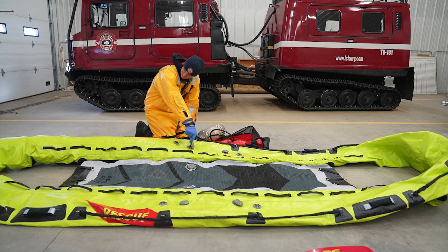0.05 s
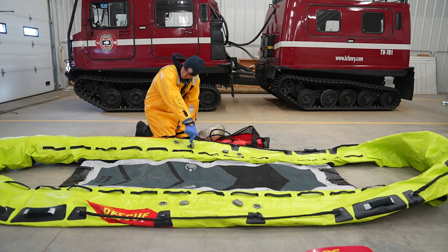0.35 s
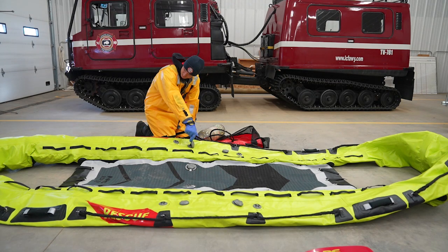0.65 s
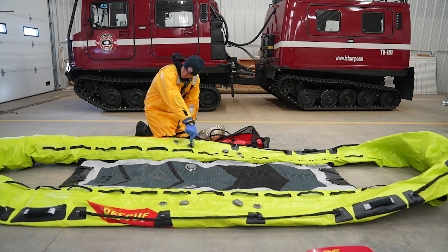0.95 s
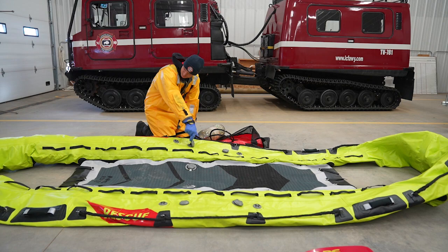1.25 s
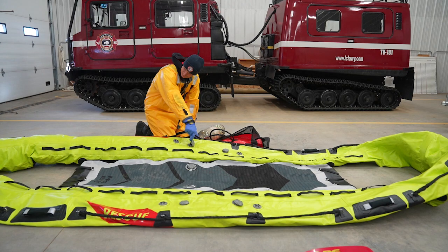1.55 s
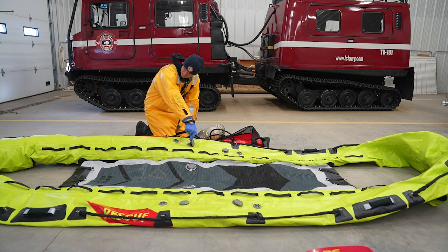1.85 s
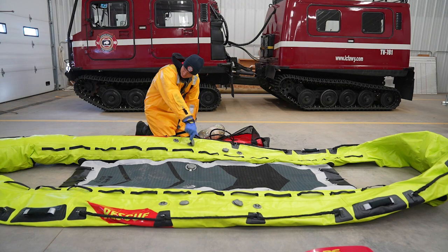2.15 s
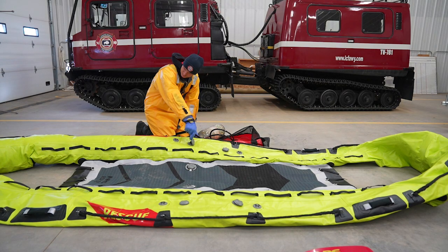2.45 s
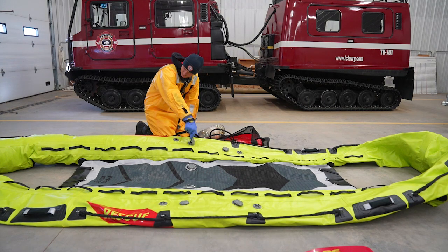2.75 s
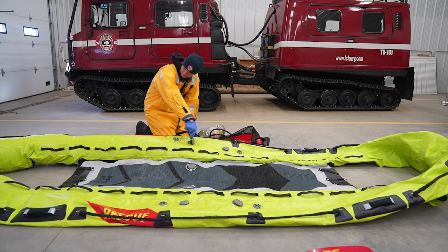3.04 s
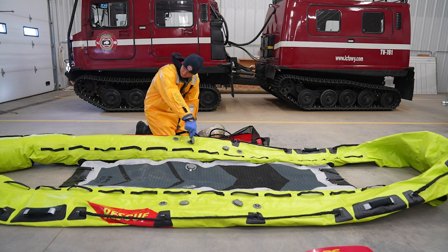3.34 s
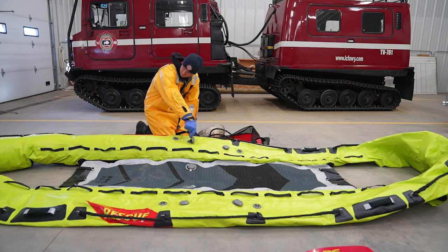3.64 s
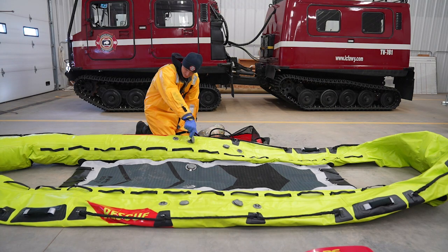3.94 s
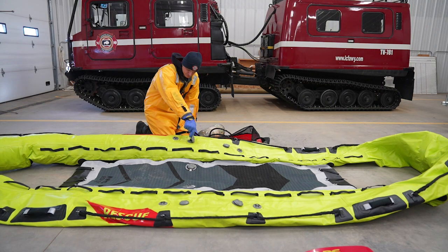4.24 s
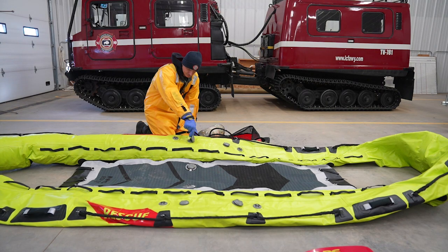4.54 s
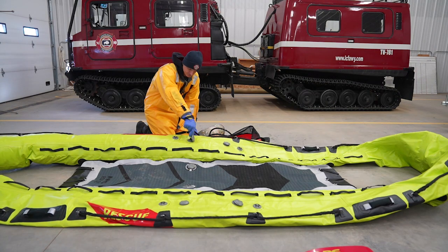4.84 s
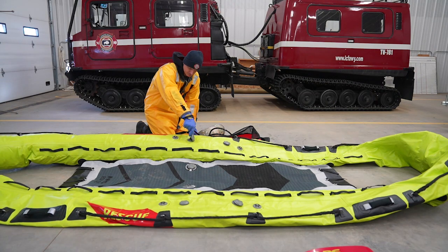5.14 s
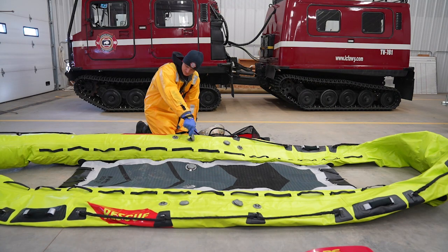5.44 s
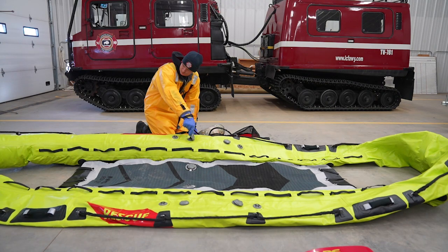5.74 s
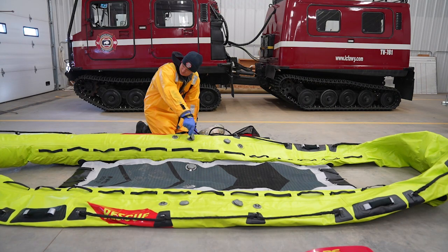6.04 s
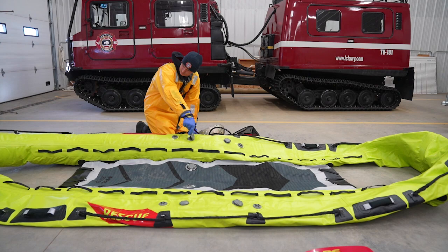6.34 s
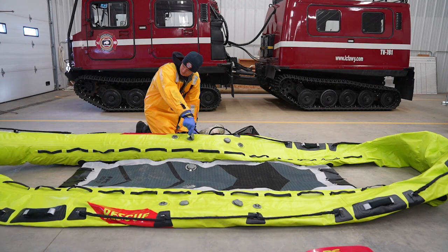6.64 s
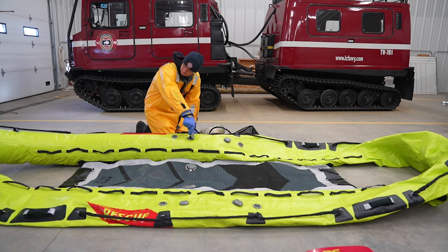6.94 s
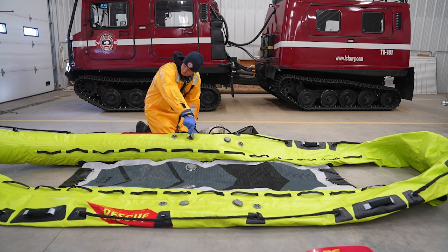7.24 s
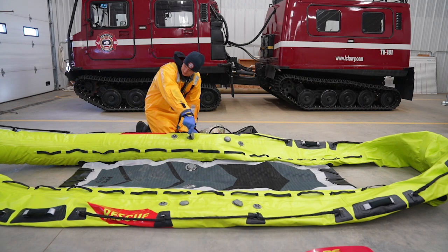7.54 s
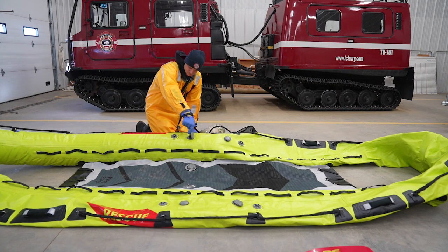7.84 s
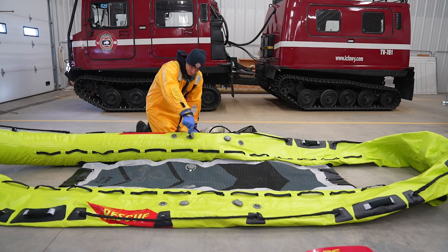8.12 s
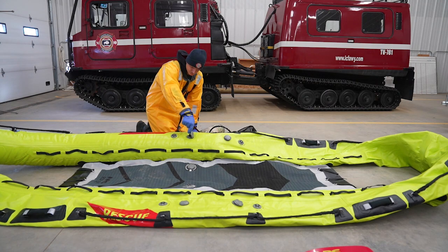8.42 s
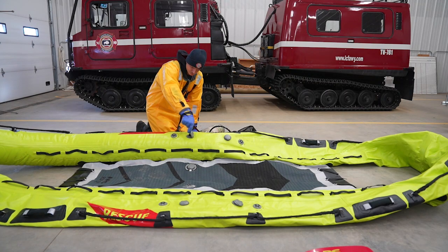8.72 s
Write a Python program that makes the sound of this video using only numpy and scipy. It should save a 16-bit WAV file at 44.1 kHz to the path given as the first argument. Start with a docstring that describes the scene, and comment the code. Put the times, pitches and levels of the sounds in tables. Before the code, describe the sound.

Compressed air hisses without a break through a valve into an inflatable boat, with a faint hollow rush inside the tube. Short breathy whistles swell and fade along the way. As the tube fills, creases in the fabric pop out with a few soft thumps and the high sizzle creeps up in pitch. The microphone is a few metres away in a lightly echoing garage.

```python
"""An inflatable boat being filled on a garage floor, heard by a mono microphone a few metres away.
From the start, compressed air hisses through a hand-held valve, ringing the valve and the hollow tube;
breathy whistles swell and die at the valve's edges. From about 2 s, creases in the fabric pop out with
soft thumps, the loudest just after 7 s. From 3 s on the tube rises faster: its colour shifts and the
jet's sizzle climbs. A last cluster of whistles comes near 8.6 s. The garage echoes throughout."""
import sys
import numpy as np
from scipy import signal
from scipy.fft import rfft, irfft, next_fast_len
from scipy.io import wavfile

SR = 44100
rng = np.random.default_rng(int(sys.argv[2]) if len(sys.argv) > 2 else 0)


def generate_wav(signal):
    """Clip the signal to [-1, 1] and save it as 16-bit WAV at the path in sys.argv[1]."""
    frames = np.transpose(np.atleast_2d(signal))
    scaled = np.clip(frames, -1, 1) * 32767
    pcm = np.round(scaled).astype(np.int16)
    wavfile.write(sys.argv[1], SR, pcm)


N = 391589
TIME = np.arange(N) / SR

# Air flow through the valve. Each row: time in seconds, level of its rush in dB.
FLOW = [(0, -35.5), (0.62, -35.5), (0.82, -37), (1.25, -37), (1.85, -36), (2.08, -35), (2.35, -36),
        (2.6, -34.9), (3.48, -36), (3.65, -34.5), (4.2, -33.5), (4.95, -34.5), (5.3, -34), (6.8, -34),
        (7.1, -34), (8.0, -33.5), (8.8, -32.5)]
# How far the tube has risen. Each row: time in seconds, fill from 0 to 1.
FILL = [(0, 0.12), (3, 0.15), (4.2, 0.43), (6.3, 0.69), (7.5, 0.84), (8.88, 1)]
# Colours of the valve's fine spray, its lower rush and the roar in the tube.
# Each row: frequency in Hz, relative spectral level in dB.
SPRAY_COLOUR = [(6000, -29), (8000, -11), (9600, -1.5), (11000, 1.4), (12000, 2.5), (13000, 0.3),
                (14600, 1.5), (16000, 0)]
RUSH_COLOUR = [(2200, -16), (3000, -14), (3400, -4.5), (3900, 1), (4400, 4.5), (5200, 3.5), (6100, 2),
               (7300, 0.25), (8800, 3), (11000, -16.5)]
TUBE_COLOUR = [(40, -32), (100, -23.5), (250, -14.5), (420, -12.5), (530, -5.5), (700, -3), (920, -2),
               (1250, -2), (1850, 2), (2300, -1.5), (2850, -8), (4000, -21)]
# Resonances and notches of the valve and of the air in the tube.
# Each row: centre in Hz, width in Hz, gain in dB with the tube slack, gain in dB with it full.
VALVE_MODES = [(3020, 330, 1.5, 3), (5300, 89, 0.5, -7), (5580, 170, -1, -2.5), (5870, 190, 1, -8),
               (6170, 180, 2, -1), (6560, 170, -3, 1.5), (7500, 500, -3, -0.5), (8910, 260, 6.5, 3),
               (8980, 340, -3, -4.5), (9700, 250, 5.5, 4), (10320, 170, 6.5, -4), (10600, 280, 0, 8.5),
               (11060, 250, 4.5, 4.5), (11350, 400, -2, 3.5), (12020, 690, -2, 6), (13450, 250, 5, 1),
               (13340, 250, -3, 10.5), (13850, 300, 0.5, 0.5), (14500, 250, 3, 8), (15200, 350, -0.5, 4.5)]
TUBE_MODES = [(543, 52, 0, -1), (600, 95, -0.5, -3.5), (808, 160, 0.5, -3), (918, 38, -11.5, -9),
              (1042, 65, 0.5, -7), (1294, 80, -8, 3.5), (1510, 46, -2, 3), (1653, 84, 5, -9),
              (1870, 120, 1.5, 0), (2020, 86, 7, -5)]
# Short spurts at the valve's edge. Each row: peak time and length in seconds, pitch in Hz, level in dB.
SPURTS = [(0.169, .42, 3950, -36.5), (0.181, .3, 5000, -30), (.36, 0.061, 3940, -33),
          (0.602, .08, 4820, -28.5), (0.621, .1, 3820, -31), (1.039, .06, 4370, -34),
          (1.284, 0.024, 4430, -32), (2.106, .24, 4770, -33.5), (2.603, .18, 4860, -29),
          (3.06, 0.046, 4160, -38), (4.125, .24, 5200, -32), (6.995, 0.16, 4240, -36.5),
          (7.647, 0.25, 4150, -32.5)]
# Long whistles: most sing at the valve, the low 2450 Hz one in the tube. # Each row: peak time and length in
# seconds, pitch and width in Hz, level in dB.
LONG_WHISTLES = [(0.097, 0.36, 2450, 350, -45.5), (.15, .5, 15500, 700, -32),
                 (2.64, 0.19, 13800, 1500, -31), (5.7, 2.6, 5540, 200, -39.5),
                 (7.201, .9, 6000, 300, -37.5), (7.27, 0.7, 8650, 1000, -30.5),
                 (7.801, 0.55, 15200, 1010, -38), (8.598, 0.68, 3650, 800, -42),
                 (8.598, .4, 8070, 1050, -30), (8.622, 0.45, 14400, 1200, -29.5)]
# The sizzle climbs as the tube lifts the valve. Each row: time in seconds, pitch in Hz, level in dB.
SIZZLE = [(0, 9750, -39), (1.7, 9820, -41), (2.1, 9700, -32), (3.0, 10180, -38), (4.1, 10180, -32.5),
          (5.0, 10350, -41), (5.7, 11450, -35), (7.1, 11770, -33), (8.2, 11830, -36), (8.5, 11900, -55)]
# Hollows that open and close in the hiss.
# Each row: deepest moment and length in seconds, centre and width in Hz, depth in dB.
HOLLOWS = [(.1, 1, 14000, 900, -1), (6.5, 4, 13240, 400, -6), (7.3, 1.1, 10600, 300, -5),
           (8.6, 0.41, 12100, 500, -8), (8.6, 0.97, 5150, 450, -6), (8.75, .4, 6400, 300, -9)]
# Hard surfaces by the valve. Each row: echo delay in seconds with the tube slack, share reflected.
SURFACES = [(.0031, 0.056), (.0074, 0.11), (0.0127, 0.18)]
# The garage's low room tone. Each row: frequency in Hz, relative spectral level in dB.
ROOM_COLOUR = [(20, -12), (45, -2), (75, -3), (100, 2.5), (160, 2.5), (400, -5), (1500, -27)]
# Creases popping out. Each row: start in seconds, level in dB, pitch in Hz.
CREASES = [(1.876, -51, 114.3), (3.173, -38, 134), (3.745, -39.5, 163), (4.743, -48, 123),
           (5.420, -32, 300), (5.428, -36.5, 95.5), (6.757, -39, 150), (6.828, -35, 210), (6.979, -38, 189),
           (7.175, -22.5, 480), (7.178, -37, 169), (7.688, -36, 104), (8.195, -44, 109)]


def undb(db):
    """Decibels to gain."""
    return 10 ** (np.asarray(db) / 20)


def curve(table, column=1):
    """One column of a table of times, joined by straight lines."""
    rows = np.array(table)
    return np.interp(TIME, rows[:, 0], rows[:, column])


def walk(rate):
    """A random drift with a spread near 1 and about rate turns a second."""
    steps = rng.standard_normal(2048)
    return 1.2 * np.interp(TIME * rate, np.arange(len(steps)), steps)


def swell(t, length):
    """A smooth rise and fall that peaks at t = 0."""
    return np.exp(-2 * (t / length) ** 2)


def add(out, start_s, sound):
    """Mix a sound in from a given moment."""
    i = int(start_s * SR)
    lo, hi = max(i, 0), min(i + len(sound), N)
    if hi > lo:
        out[lo:hi] += sound[lo - i:hi - i]


def turbulence(colour, modes, band_hz):
    """Noise with a broad colour and resonances that change with the fill; rms 1 inside the band."""
    size = next_fast_len(N, True)
    hz = np.fft.rfftfreq(size, 1 / SR)
    colour_hz, colour_db = np.array(colour).T
    broad_db = np.interp(np.log(hz + 1), np.log(colour_hz), colour_db)
    rolloff = np.minimum(1, hz / colour_hz[0]) * np.minimum(1, colour_hz[-1] / (hz + 1)) ** 2
    coarse_hz = hz[::16]
    modes_db = np.zeros((2, len(coarse_hz)))
    for centre, width, slack_db, full_db in modes:
        modes_db += np.outer([slack_db, full_db], np.exp(-(2 * (coarse_hz - centre) / width) ** 2))
    noise, states = rfft(rng.standard_normal(size)), []
    for state_db in modes_db:
        gain = undb(broad_db + np.interp(hz, coarse_hz, state_db)) * rolloff
        gain /= np.sqrt(np.mean(gain ** 2 * (hz > band_hz[0]) * (hz < band_hz[1])))
        states.append(irfft(noise * gain, size)[:N])
    slack, full = states
    fill = curve(FILL)
    return (1 - fill) * slack + fill * full


def jet(usual_flow_db=-35, flutter_db=0.39, wander_db=0.47, spray_build_s=1.0):
    """One flow drives the fluttering rush and spray in the valve and the wandering roar in the tube."""
    spray = turbulence(SPRAY_COLOUR, VALVE_MODES, band_hz=(12500, 15500))
    rush = turbulence(RUSH_COLOUR, VALVE_MODES, band_hz=(5800, 7700))
    roar = turbulence(TUBE_COLOUR, TUBE_MODES, band_hz=(500, 2600))
    flow_db, fill = curve(FLOW), curve(FILL)
    push_db = flow_db - usual_flow_db
    weak_start_db = -2.4 * np.exp(-TIME / spray_build_s)
    spray_db = -28 + 0.56 * push_db + 1.3 * fill + weak_start_db
    roar_db = -36 + 0.49 * push_db - 1.6 * fill
    valve = rush * undb(flow_db) + spray * undb(spray_db)
    flutter = undb(flutter_db * walk(rate=45))
    return valve * flutter + roar * undb(roar_db + wander_db * walk(rate=9))


def narrow_band(offset_hz, width_hz):
    """Gain of a breathy band of noise at a distance from its centre; rms 1."""
    gain = 1 / (1 + (offset_hz / (.7 * width_hz)) ** 2) ** 1.5
    return gain / np.sqrt(np.mean(gain ** 2))


def whistle(peak_s, length, centre_hz, width_hz, db):
    """Air catches an edge: a narrow band of turbulence swells and dies away."""
    out, size = np.zeros(N), next_fast_len(int(4 * length * SR), True)
    gain = narrow_band(np.fft.rfftfreq(size, 1 / SR) - centre_hz, width_hz)
    tone = irfft(rfft(rng.standard_normal(N), size) * gain, size)
    t = (np.arange(size) - size / 2) / SR
    add(out, peak_s + t[0], tone * undb(db) * swell(t, length))
    return out


def sizzle(width_hz=900):
    """A high band of turbulence glides upward as the tube lifts the valve."""
    size = next_fast_len(N, True)
    gain = narrow_band(np.fft.rfftfreq(size, 1 / SR), width_hz)
    noise = irfft(rfft(rng.standard_normal((2, size))) * gain, size)[:, :N]
    phase = 2 * np.pi * np.cumsum(curve(SIZZLE, column=1)) / SR
    band = noise[0] * np.cos(phase) + noise[1] * np.sin(phase)
    return band * undb(curve(SIZZLE, column=2))


def edge_tones(spurt_width_hz=520, focus_s=0.045, waver_db=0.16):
    """Short spurts, long whistles and the sizzle waver together in the same stream of air."""
    # A spurt needs time to focus: the shorter, the broader.
    spurts = sum(whistle(peak_s, length, hz, spurt_width_hz * (1 + focus_s / length), db)
                 for peak_s, length, hz, db in SPURTS)
    held = sum(whistle(*row) for row in LONG_WHISTLES)
    return (spurts + held + sizzle()) * undb(waver_db * walk(rate=25))


def hollowed(hiss):
    """Narrow bands of the hiss sink away for a while."""
    for deepest_s, length, hz, width, depth_db in HOLLOWS:
        band = signal.lfilter(*signal.iirpeak(hz, hz / width, fs=SR), hiss)
        dip = undb(depth_db * swell(TIME - deepest_s, length))
        hiss = hiss + band * (dip - 1)
    return hiss


def reflections(hiss, stretch=0.0396):
    """Floor and hull return the hiss; the paths lengthen as the valve lifts, so the comb drifts."""
    lift = 1 + stretch * curve(FILL)
    echoes = sum(share * np.interp(TIME - lag * lift, TIME, hiss, left=0) for lag, share in SURFACES)
    return (hiss + echoes) / np.sqrt(1 + sum(share ** 2 for _, share in SURFACES))


def garage(direct, wet_db, t60):
    """The direct sound reaches the microphone, then the room's diffuse tail; total power is kept."""
    t = np.arange(SR) / SR
    tail = rng.standard_normal(SR) * undb(-60 * t / t60) * (t > .012)
    tail *= undb(wet_db) / np.sqrt(np.sum(tail ** 2))
    return (direct + signal.fftconvolve(direct, tail)[:N]) / np.sqrt(1 + undb(2 * wet_db))


def room_tone(level_db=-63.0):
    """The garage's own faint, steady rumble."""
    return undb(level_db) * turbulence(ROOM_COLOUR, modes=[], band_hz=(0, SR))


def creases(swing_cycles=0.9, flick_db=-8, skin_hz=98, skin_t60=.26):
    """A fold snaps out: a quick flick, one damped swing of the fabric, then the skin rings faintly."""
    out, t = np.zeros(N), np.arange(SR // 2) / SR
    skin = undb(-17) * np.sin(2 * np.pi * skin_hz * t) * undb(-60 * t / skin_t60)
    for start_s, db, hz in CREASES:
        cycles = t * hz
        envelope = np.exp(-(cycles / swing_cycles) ** 2) * (1 - np.exp(-10 * cycles))
        swing = np.sin(2 * np.pi * cycles) * envelope
        flick = undb(flick_db) * np.sin(2 * np.pi * 2 * cycles) * np.exp(-2 * cycles)
        # A small fold radiates little bass and hardly stirs the tube's skin.
        low_cut = signal.butter(2, min(0.94 * hz, skin_hz), "high", fs=SR, output="sos")
        thump = signal.sosfilt(low_cut, swing + flick)
        add(out, start_s, undb(db) * (thump / np.abs(thump).max() + skin * skin_hz / hz))
    return out


def scene():
    """From a few metres off, the thumps ring longer than the hiss; one microphone feeds both channels."""
    at_valve = hollowed(jet() + edge_tones())
    hiss = garage(reflections(at_valve), wet_db=-16.0, t60=0.58)
    thumps = garage(creases(), wet_db=-3.5, t60=0.69)
    return np.tile(hiss + thumps + room_tone(), (2, 1))


def record(dry):
    """The recorder cuts the top steeply above 15750 Hz."""
    return signal.sosfilt(signal.ellip(12, .1, 80, 15750, fs=SR, output="sos"), dry)


dry = scene()
out = record(dry)
generate_wav(out)
```